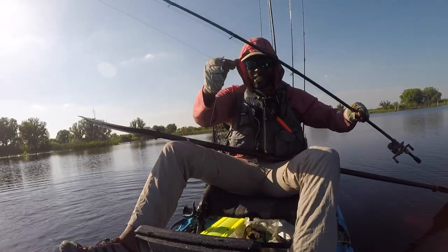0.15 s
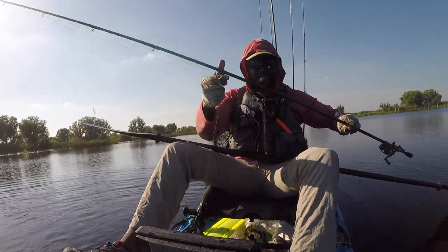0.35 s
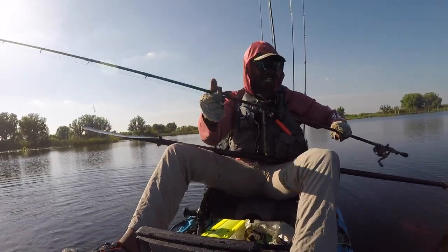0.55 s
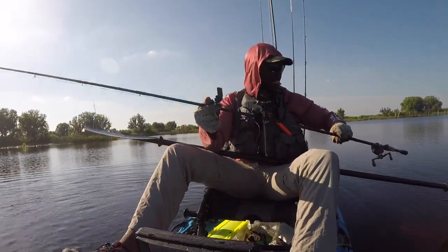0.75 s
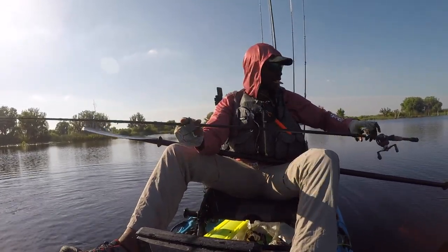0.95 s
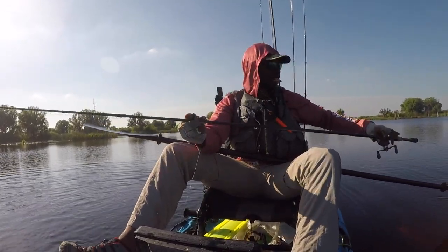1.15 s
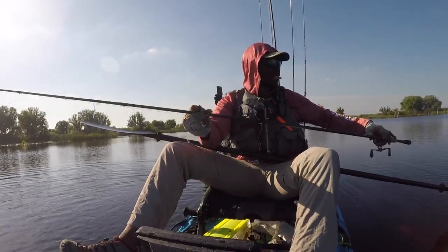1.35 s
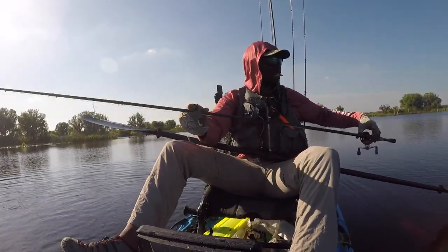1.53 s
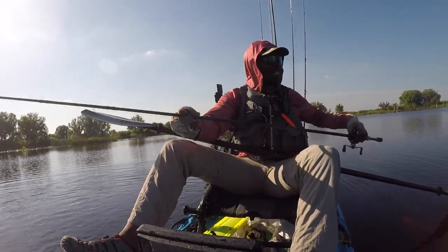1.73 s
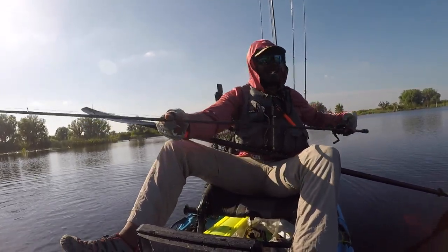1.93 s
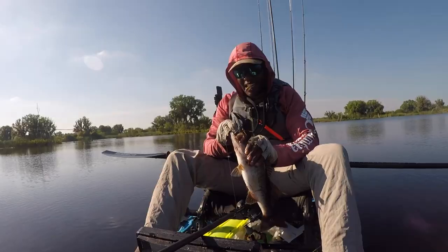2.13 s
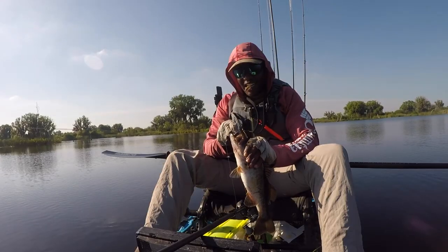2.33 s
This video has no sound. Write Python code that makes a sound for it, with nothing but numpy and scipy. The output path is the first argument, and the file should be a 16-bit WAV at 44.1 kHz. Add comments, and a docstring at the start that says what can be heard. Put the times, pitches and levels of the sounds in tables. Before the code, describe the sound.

Fishing gear knocks a plastic kayak hull, picked up close by a mounted camera on an open lake. Muffled thuds at 0.1 and 0.25 s, then harder hollow knocks with clicks and scrapes from 0.55 to 1.4 s, loudest near 1.07, over low boom and faint churning water. A distant marsh bird buzzes 0.8-1.65 s. More bumps at 1.6-2.05, then abruptly only soft lake lapping from 2.1.

```python
"""Gear and a fishing rod knock and scrape on a plastic kayak hull that carries the camera.
Noisy pushes ring hull and mount resonances; wandering low tones boom and sway, and noise churns with droplets.
A marsh bird gives a short note and a buzz of falling pulses, with an echo over faintly lapping lake noise.
At the end the scene jumps to a calm moment: the lake alone, at a higher level, without hull boom."""
import sys
import numpy as np
from scipy import signal
from scipy.fft import rfft, irfft, next_fast_len
from scipy.io import wavfile
from scipy.ndimage import map_coordinates

SR = 44100
rng = np.random.default_rng(int(sys.argv[2]) if len(sys.argv) > 2 else 0)


def linear_from_db(decibels):
    """Turn decibels (scalar or array-like) into linear amplitude factors; 0 gives 1."""
    return 10 ** (np.asarray(decibels, float) / 20)


def unload_wav(signal):
    """Save mono or channel-first audio to the path in sys.argv[1] as 16-bit WAV at rate SR, clipped to [-1, 1]."""
    wavfile.write(
        sys.argv[1],
        SR,
        np.round(np.clip(np.atleast_2d(signal).T, -1, 1) * 32767).astype(np.int16),
    )


N = 103635  # samples
CUT_S = 2.092  # start of the calm moment

# Faint lapping and air. Each row: frequency in Hz, relative density in dB per Hz.
LAKE_SPECTRUM = [(85, -56.5), (130, 1), (300, 0), (850, -14.5), (9000, -29), (12000, -31.5), (15000, -83)]
# Boom of the hull. Each row: time in seconds, level in dB.
BOOM_LEVEL = [(0, -42), (.23, -50.5), (.265, -15), (.345, -18.5), (.365, -32), (.53, -36.5), (.64, -24.5),
              (.78, -23.5), (.83, -18.5), (1.04, -41), (1.09, -18.5), (1.42, -22.5), (1.5, -40),
              (1.76, -42), (1.79, -23), (2.02, -40)]
# Pitch of that boom. Each row: time in seconds, centre frequency in Hz.
BOOM_PITCH = [(1.15, 125.7), (1.4, 101.6)]
# Slow sway of the hull. Each row: time in seconds, level in dB.
SWAY_LEVEL = [(.25, -38.5), (.78, -29), (.86, -16.5), (.96, -25.5), (1.15, -27), (1.38, -20), (1.5, -31.5),
              (1.74, -40.5), (2.05, -26)]
# Low tones of the sway. Each row: centre frequency in Hz, relative level in dB.
SWAY_MODES = [(38, 0.5), (57, -3)]
# Water churning against the hull. Each row: time in seconds, level in dB.
CHURN_LEVEL = [(0, -52), (.52, -58), (.57, -31), (.9, -33), (1.02, -56.5), (1.09, -28), (1.26, -37.5),
               (1.33, -53), (1.52, -51.5), (1.6, -37.5), (1.75, -47.5), (1.89, -36), (2.0, -47)]
# Tone of the churning. Each row: frequency in Hz, relative density in dB per Hz.
CHURN_SPECTRUM = [(70, -12.5), (180, 4.5), (350, -5), (900, -19), (4000, -50)]
# Knocks of gear. Each row: start in seconds, mount push level in dB, hull push level over it in dB.
KNOCKS = [(0.107, -27.5, 1.5), (0.242, -25, 14), (0.552, -33, 7.5), (0.637, -15.5, 3), (0.712, -26.5, 10.5),
          (0.808, -14, -5), (0.896, -37.5, 6.5), (1.064, -13, 2.5), (1.105, -30, 17), (1.123, -23, 7.5),
          (1.169, -18.5, 6), (1.237, -23, 4), (1.367, -22.5, 4.5), (1.625, -21.5, -17.5), (1.775, -16, 3.5),
          (1.867, -33.5, -7), (2.022, -27.5, -1)]
# Resonances of the hull. Each row: frequency in Hz, width in Hz, relative level in dB.
HULL_MODES = [(152, 23.7, -2.5), (212.7, 28.7, -1), (258.9, 23.3, -1), (346.3, 87.6, -8.5)]
# Resonances of the camera mount. Each row: frequency in Hz, width in Hz, relative level in dB.
MOUNT_MODES = [(596, 102, 4.5), (824, 152.4, -0.5), (1177, 301, -13)]
# Sharp ticks of hard gear. Each row: start in seconds, level in dB before colouring.
TICKS = [(0.544, -43.5), (.592, -42), (.635, -25.5), (1.064, -10.5), (1.126, -23), (1.181, -29),
         (1.237, -33), (1.3634, -27.5), (1.6264, -32), (1.642, -24.5), (1.7459, -42.5), (1.867, -30.5)]
# Tone of ticks and scrapes. Each row: frequency in Hz, relative density in dB per Hz.
CRACK_SPECTRUM = [(1200, 8), (2200, -3.5), (5000, -4), (6500, -3.5), (8000, -10.5), (10500, -21.5),
                  (15000, -54.5)]
# Short bird notes. Each row: start in seconds, length in seconds, level in dB, pitch in Hz.
NOTES = [(0.57, 0.087, -52.5, 5600)]
# Bird buzz. Each row: time in seconds, level in dB, mid-pulse pitch in Hz.
BUZZ = [(.8, -105, 5750), (.83, -50, 5750), (1.04, -47, 5900), (1.12, -52, 5850), (1.35, -54, 5700),
        (1.4, -70, 5300), (1.43, -52, 5050), (1.6, -64, 4250), (1.66, -90, 4150)]
# Bright scrapes of gear. Each row: peak time in seconds, level in dB, half length in seconds.
SCRAPES = [(.713, -29.5, 0.0083), (.802, -36, 0.003), (.82, -24, 0.0053), (1.068, -31.5, 0.012),
           (1.125, -36.5, 0.009), (1.164, -37, 0.008), (1.66, -44, 0.019), (1.777, -25.5, 0.0043),
           (1.882, -45, 0.012), (2.047, -24.5, 0.0066), (2.076, -34, 0.011)]
# Phase between the microphone ports. Each row: frequency in Hz, lead of the left in radians.
PORT_LEAD = [(50, 0.4), (200, -0.53), (520, -2.5), (1100, -4.5), (2500, -5.5), (8000, -6.5)]
# Balance of the ports at a tilt of 1. Each row: frequency in Hz, left minus right in dB.
PORT_TILT = [(50, -1), (110, -11.5), (380, -17.5), (900, -1.5), (5000, -2.5)]
# Likeness of the ports. Each row: frequency in Hz, shared share of the left amplitude (0 to 1).
PORT_LIKENESS = [(200, 0.71), (700, 0.77), (6000, 0.75)]


def unit(x):
    """Scale to rms 1."""
    return x / np.sqrt(np.mean(x ** 2) + 1e-20)


def along(points, hz):
    """Read (Hz, value) points on a log frequency axis."""
    f, v = np.transpose(points)
    return np.interp(np.log(hz + 1), np.log(f + 1), v)


def curves(rows):
    """Draw one value per sample for each column after the time."""
    s, *columns = np.transpose(rows)
    return [np.interp(np.arange(N) / SR, s, column) for column in columns]


def wobble(rate):
    """A smooth random curve with rate knots a second."""
    knots = rng.standard_normal(int(N * rate / SR) + 4)
    return map_coordinates(knots, [np.arange(N) * rate / SR])


def filtered(x, response):
    """Shape x by a complex response of frequency."""
    m = next_fast_len(N + SR // 2)
    return irfft(rfft(x, m) * response(np.fft.rfftfreq(m, 1 / SR)), m)[..., :N]


def body(modes):
    """Causal resonances with steep upper skirts, scaled so that white noise keeps its rms."""
    def shape(f):
        total = 0
        for k, (centre, width, db) in enumerate(modes):
            damping = 1j * f * width
            # alternating signs, as neighbouring modes answer in opposite phase
            total = total + (-1) ** k * linear_from_db(db) * damping / (centre * centre - f * f + damping)
        return total / (1 + 1j * f / (2 * modes[-1][0])) ** 2
    return lambda f: shape(f) / np.sqrt(np.mean(abs(shape(f)) ** 2))


def colour(spectrum):
    """A spectrum as gain, scaled so that white noise keeps its rms."""
    def response(f):
        gain = linear_from_db(along(spectrum, f))
        return gain / np.sqrt(np.mean(gain ** 2))
    return response


def ports(pair, tilt):
    """A shared and an own stream reach the two microphone ports with their lag and tilt."""
    def left(f):
        shared = np.clip(along(PORT_LIKENESS, f), 0, 1)
        gain = linear_from_db(tilt * along(PORT_TILT, f) / 2) * np.exp(1j * along(PORT_LEAD, f))
        return gain * [shared, np.sqrt(1 - shared * shared)]

    def right(f):
        return linear_from_db(-tilt * along(PORT_TILT, f) / 2)
    return np.array([filtered(pair, left).sum(0), filtered(pair[0], right)])


def lake():
    """Faint lapping and air: slowly breathing coloured noise of about rms 1."""
    flutter = linear_from_db(0.5 * wobble(30.5))
    water = filtered(rng.standard_normal((2, N)) * flutter, colour(LAKE_SPECTRUM))
    return linear_from_db(wobble(5.73)) * ports(water, tilt=0)


def rolling(modes, rate):
    """Two streams of low tones that wander in pitch and level, together of rms 1."""
    def tone(hz, db):
        level = linear_from_db(db + 2.4 * wobble(rate))
        wander = 1 + 0.0716 * wobble(rate)
        cycles = rng.random() + np.cumsum(hz * wander / SR)
        return level * np.sin(2 * np.pi * cycles)
    return unit(np.array([sum(tone(hz, db) for hz, db in modes) for _ in range(2)]))


def hull_boom():
    """The angler's moves keep the hull booming: one wandering low tone with a ragged level."""
    ragged = 1 + 0.92 * np.array([wobble(80), wobble(80)])
    tone = rolling([(curves(BOOM_PITCH)[0], 0)], rate=25)
    return linear_from_db(curves(BOOM_LEVEL)[0]) * unit(ragged * tone)


def hull_sway():
    """The angler's moves sway the hull: slowly wandering tones at the bottom of the range."""
    return rolling(SWAY_MODES, rate=11) * linear_from_db(curves(SWAY_LEVEL)[0])


def spray(level, count=700):
    """Droplets of scattered pitch and size: decaying sines that follow the churning level."""
    out = np.zeros((2, N + SR))
    t = np.arange(SR // 50) / SR
    chances, scatter = rng.random((2, count)), rng.standard_normal((2, count))
    for when, side, pitch, size in zip(*chances, *scatter):
        hz = np.clip(2540 * np.exp(0.7 * pitch), 0, SR / 4)
        i = int(when * N)
        drop = np.exp(-t * hz / 4) * np.sin(2 * np.pi * hz * t)  # fades by 1/e in 4 cycles
        out[int(2 * side), i:i + len(t)] += level[i] * linear_from_db(-18.5 + 5.7 * size) * drop
    return out[:, :N]


def churning_water():
    """Water churns and spatters against the hull: unsteady coloured noise with droplets on top."""
    level = linear_from_db(curves(CHURN_LEVEL)[0])
    unsteady = linear_from_db(4.03 * wobble(60) + 2.8 * wobble(400))
    churn = filtered(level * unsteady * rng.standard_normal((2, N)), colour(CHURN_SPECTRUM))
    return churn + spray(level)


def pushes(rows, shape, grainy_db):
    """Two streams of noisy pushes, each with a faint ragged rattle dying away behind it."""
    rattle_db, rattle_s = -18.5, 0.058  # level against the push, decay time
    t = np.arange(N) / SR
    envelope = np.zeros(N)
    for s, db, length in rows:
        push = shape((t - s) / max(length, 0.001))
        rattle = (t > s) * linear_from_db(rattle_db) * np.exp(-abs(t - s) / rattle_s)
        envelope += linear_from_db(db) * (push + rattle)
    return envelope * linear_from_db(grainy_db * wobble(300)) * rng.standard_normal((2, N))


def knocks():
    """Each knock pushes on hull and mount at once: the hull thuds and the mount rings."""
    hull_push_s, mount_push_s = 0.014, 0.0095

    def blow(u):
        return (1 - np.exp(-6 * np.clip(u, 0, 9))) * np.exp(-u ** 2)
    hull_rows = [(s, db + thud, hull_push_s) for s, db, thud in KNOCKS]
    mount_rows = [(s, db, mount_push_s) for s, db, _ in KNOCKS]
    thuds = filtered(pushes(hull_rows, blow, grainy_db=3.5), body(HULL_MODES))
    rings = filtered(pushes(mount_rows, blow, grainy_db=4.5), body(MOUNT_MODES))
    return thuds + rings


def ticks():
    """Hard gear ticks: abrupt, short noise clicks with which the camera case rings briefly."""
    decay_s, ring_hz = 0.0021, 6514
    t = np.arange(N) / SR
    click = 0.55 * np.sin(2 * np.pi * ring_hz * t) + rng.standard_normal((2, N))
    envelope = sum(linear_from_db(db) * (t > s) * np.exp(-abs(t - s) / decay_s) for s, db in TICKS)
    return filtered(envelope * click, colour(CRACK_SPECTRUM))


def bird_note():
    """A short wavering whistle that swells and fades."""
    t = np.arange(N) / SR
    out = np.zeros(N)
    for s, length, db, hz in NOTES:
        swell = np.sin(np.pi * np.clip((t - s) / length, 0, 1))
        out += linear_from_db(db) * swell * wobble(900) * np.sin(2 * np.pi * hz * t)
    return out


def bird_buzz():
    """A buzz of fast pulses, each falling in pitch, with a rougher lower voice just behind."""
    db, hz = curves(BUZZ)
    t = np.arange(N) / SR
    pulse_rate = np.where(t < 1.39, 122.5, 108)  # pulses a second, slower as the pitch drops
    u = np.cumsum(pulse_rate * (1 + 0.028 * wobble(57)) / SR) % 1  # position within a pulse
    gate = np.sin(np.pi * u) ** 2.8
    fall = 1 - 0.22 * (u - 0.5)
    phase = 2 * np.pi * np.cumsum(hz * fall / SR)
    upper = gate * (1 + 0.7 * wobble(1000)) * np.sin(phase)
    lower = linear_from_db(-1) * np.roll(gate, 150) * wobble(2600) * np.sin(0.72 * phase)  # 150 samples late
    return linear_from_db(db) * (upper + lower)


def bird():
    """The marsh bird's note and buzz, with the far shore's answer as a fading noise echo."""
    echo_s, echo_db = 0.05, -5  # decay time, level against the call
    call = bird_note() + bird_buzz()
    n = np.arange(SR // 8)
    echo = rng.standard_normal((2, len(n))) * np.exp(-n / (echo_s * SR))
    answer = signal.fftconvolve(call[None], echo / np.linalg.norm(echo[0]), axes=1)[:, :N]
    return call + linear_from_db(echo_db) * answer


def scrapes():
    """Gear scrapes on the plastic: grainy bright noise that swells and fades."""
    def swell(u):
        return np.exp(-abs(np.where(u < 0, 0.75 * u, u)) ** 1.74)  # rises slower than it falls
    return filtered(pushes(SCRAPES, swell, grainy_db=2.5), colour(CRACK_SPECTRUM))


def scene():
    """The busy part gives way within a few ms to the calm part, where the lake is louder."""
    lap_db, calm_db = -55.5, -49
    calm = np.clip((np.arange(N) / SR - CUT_S) / 0.0035, 0, 1)
    water = hull_boom() + hull_sway() + churning_water()
    gear = knocks() + ticks() + scrapes()
    busy = ports(water + gear, tilt=0.75) + bird()
    return (1 - calm) * busy + linear_from_db(lap_db + calm * (calm_db - lap_db)) * lake()


def roll_off(x):
    """The treble ends steeply here."""
    return signal.sosfilt(signal.butter(12, 15460, fs=SR, output="sos"), x)


def record(dry):
    """Soft clipping near full scale, then the recorder's treble roll-off."""
    ceiling = 0.97
    clipped = dry / (1 + abs(dry / ceiling) ** 6) ** (1 / 6)
    mix = filtered(clipped, lambda f: 1 / (1 + (f / 14000) ** 10))  # half amplitude at 14 kHz
    return roll_off(mix)


dry = scene()
out = record(dry)
unload_wav(out)
```